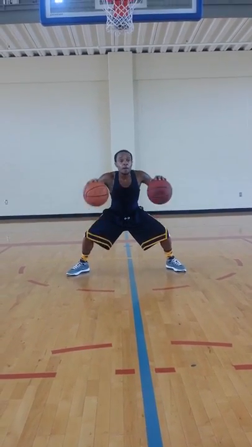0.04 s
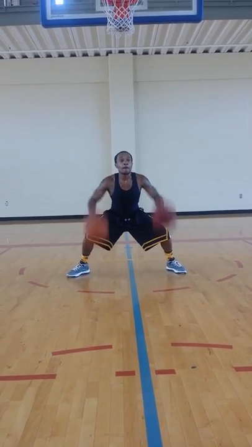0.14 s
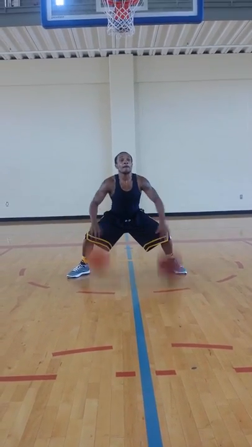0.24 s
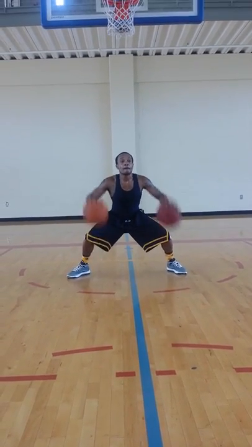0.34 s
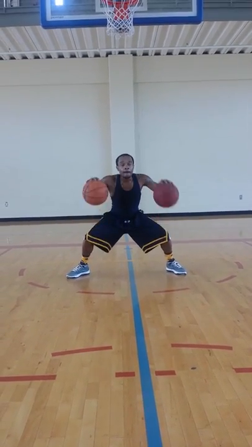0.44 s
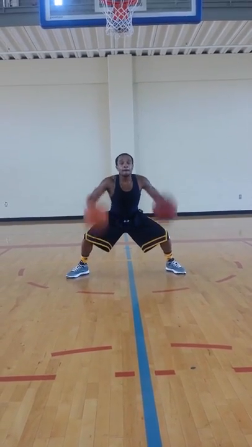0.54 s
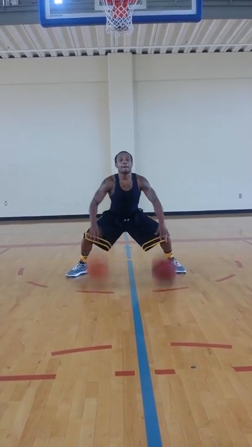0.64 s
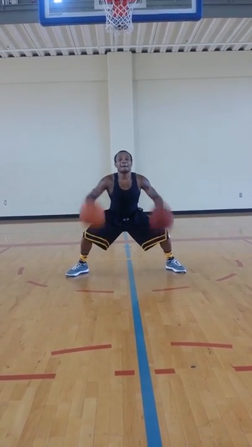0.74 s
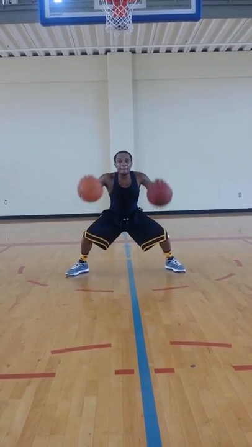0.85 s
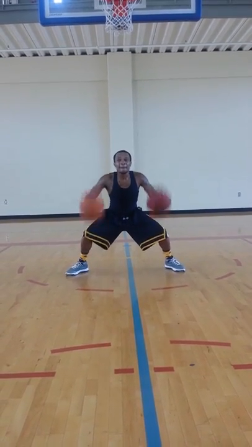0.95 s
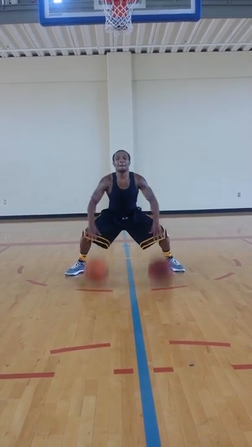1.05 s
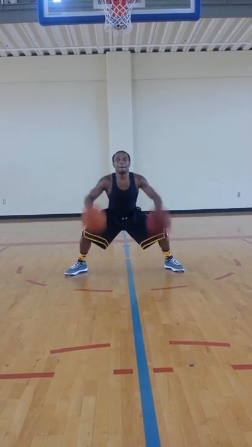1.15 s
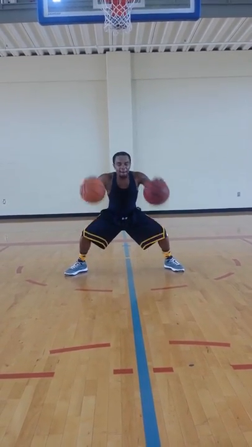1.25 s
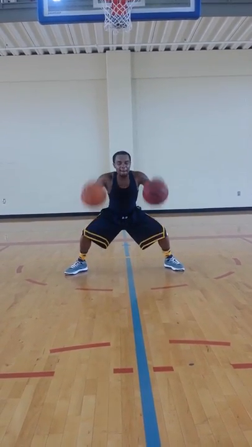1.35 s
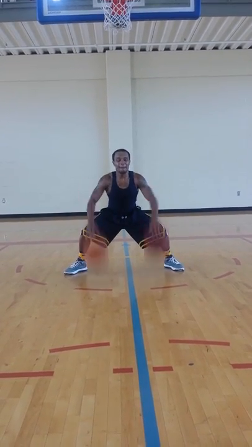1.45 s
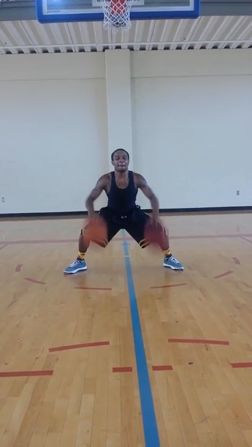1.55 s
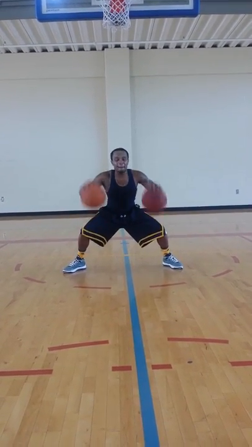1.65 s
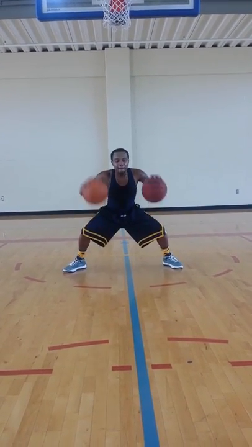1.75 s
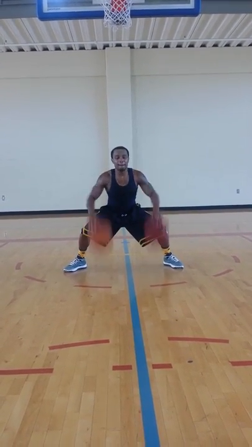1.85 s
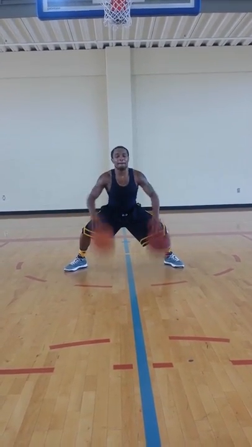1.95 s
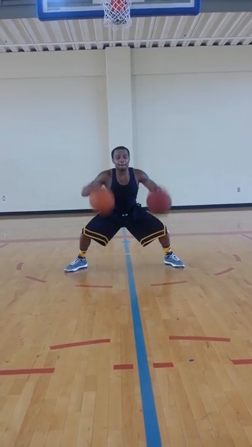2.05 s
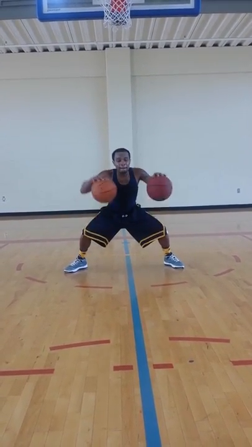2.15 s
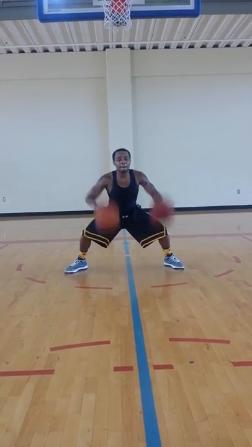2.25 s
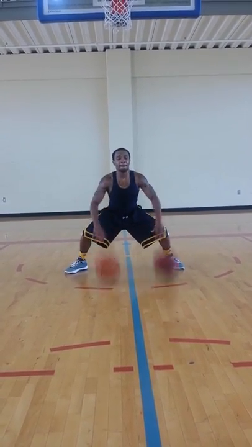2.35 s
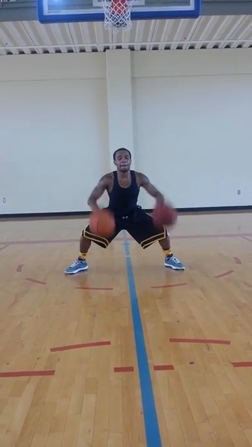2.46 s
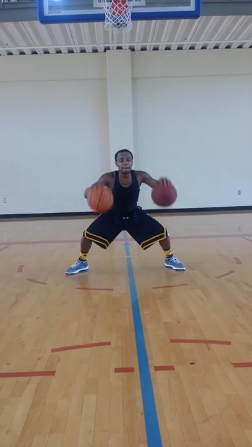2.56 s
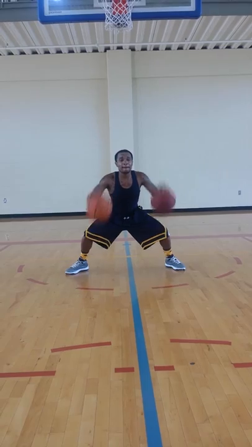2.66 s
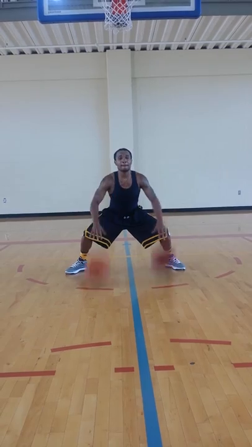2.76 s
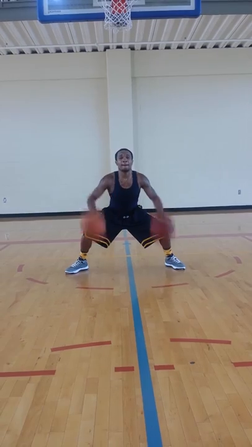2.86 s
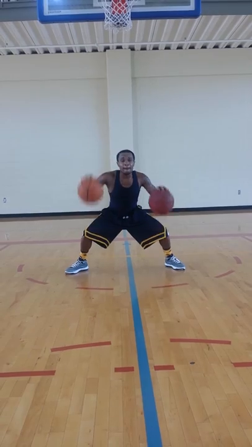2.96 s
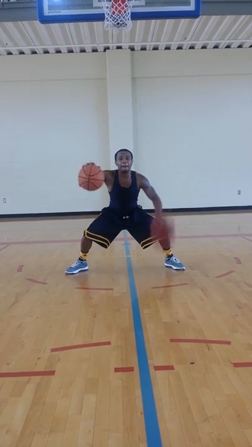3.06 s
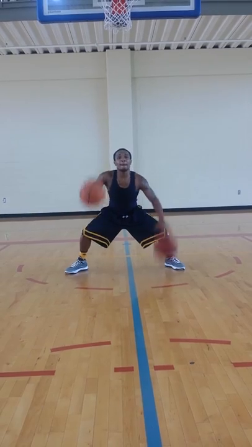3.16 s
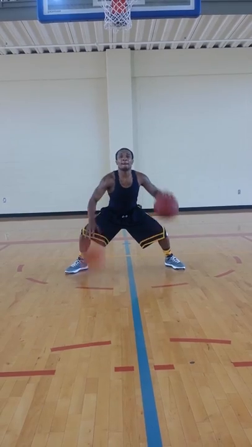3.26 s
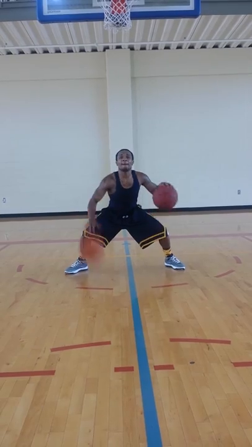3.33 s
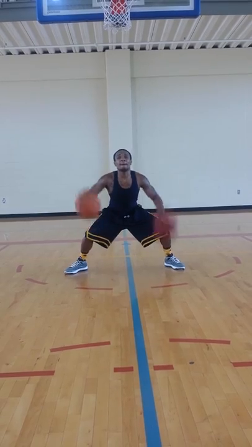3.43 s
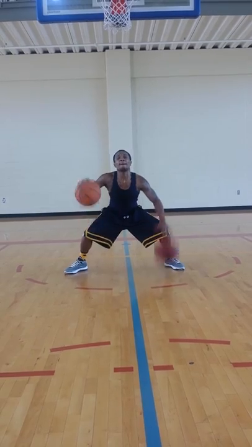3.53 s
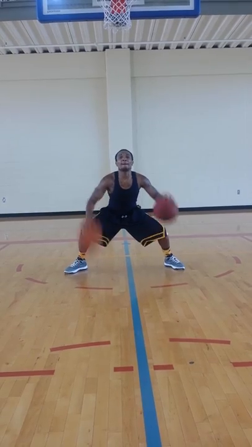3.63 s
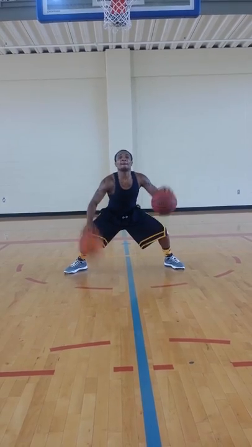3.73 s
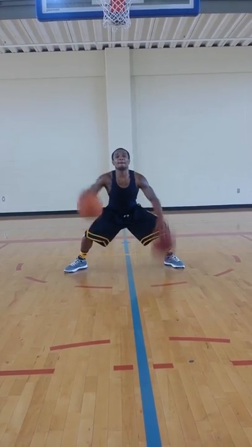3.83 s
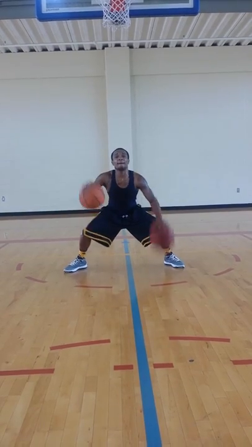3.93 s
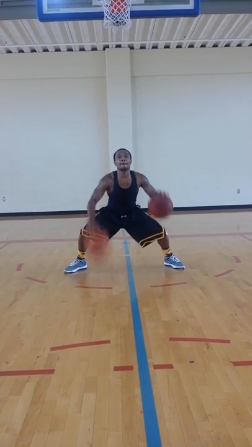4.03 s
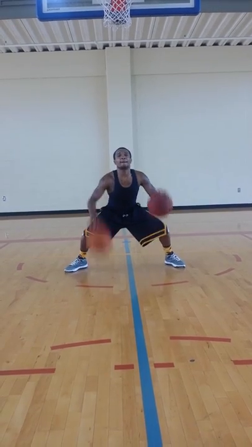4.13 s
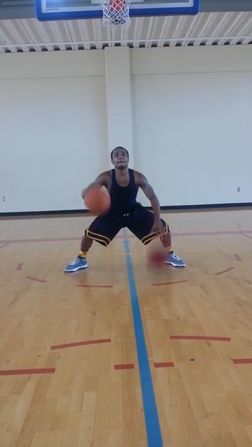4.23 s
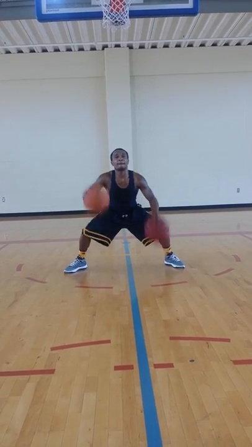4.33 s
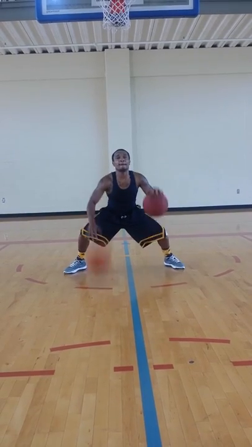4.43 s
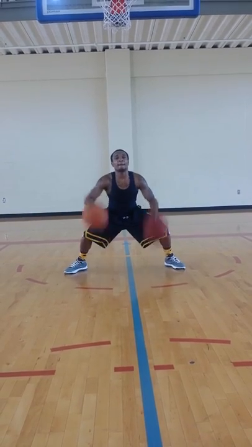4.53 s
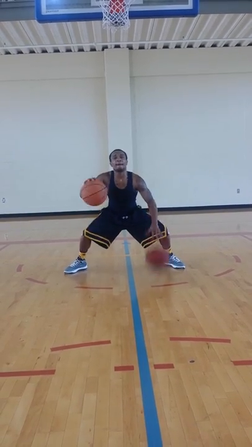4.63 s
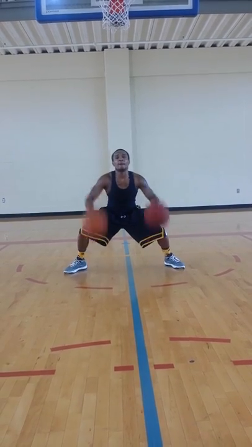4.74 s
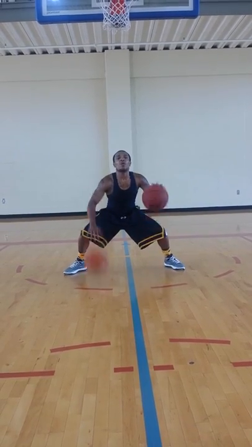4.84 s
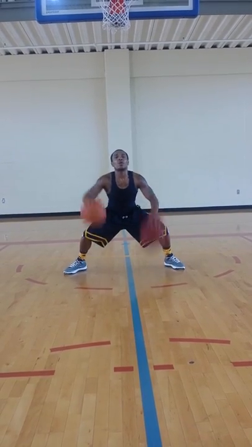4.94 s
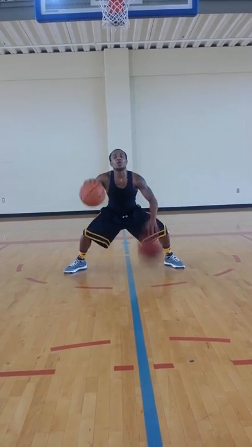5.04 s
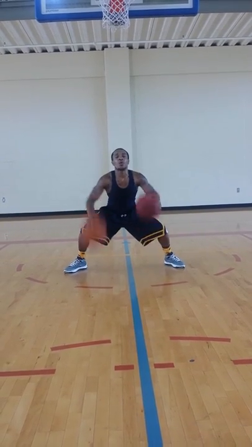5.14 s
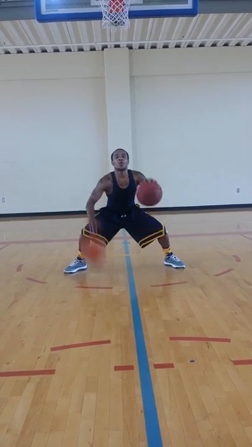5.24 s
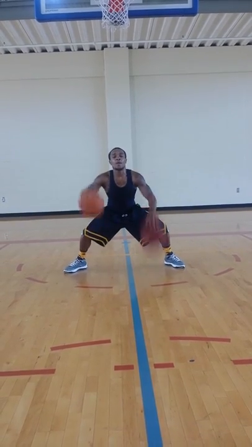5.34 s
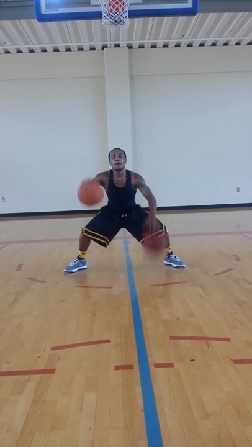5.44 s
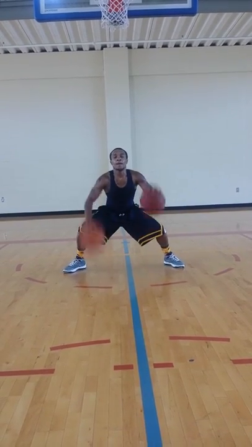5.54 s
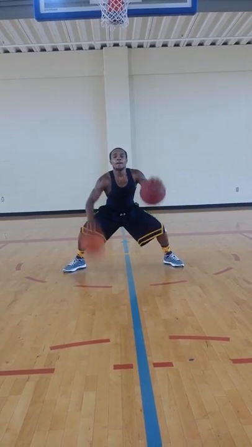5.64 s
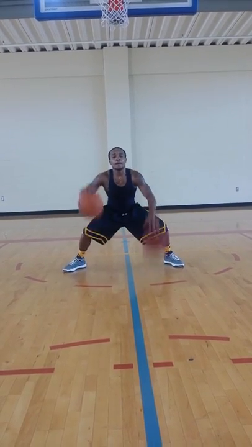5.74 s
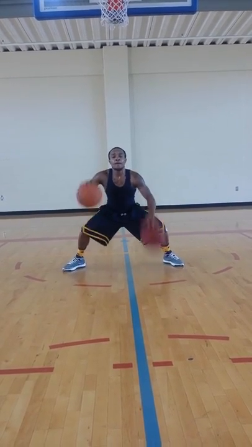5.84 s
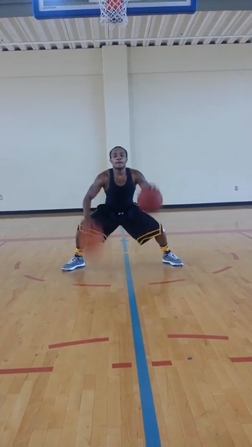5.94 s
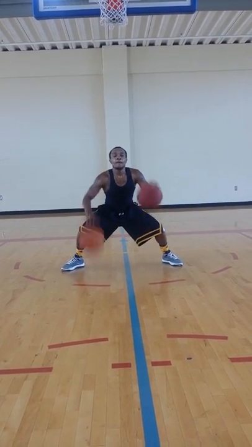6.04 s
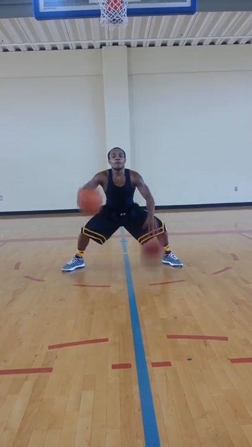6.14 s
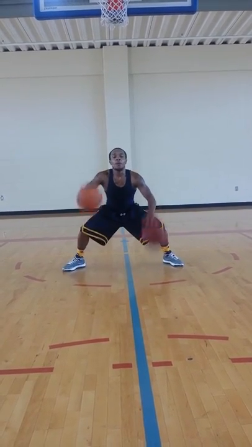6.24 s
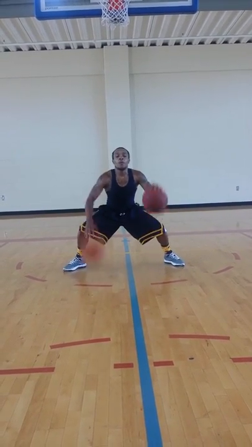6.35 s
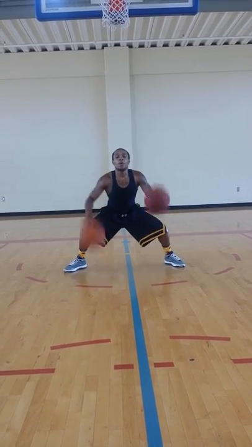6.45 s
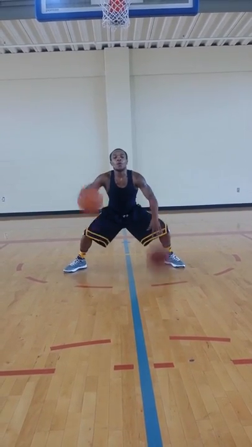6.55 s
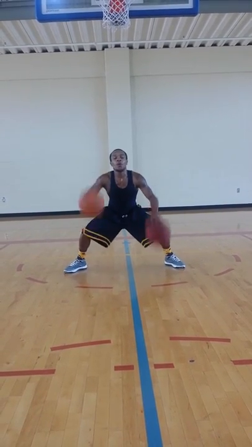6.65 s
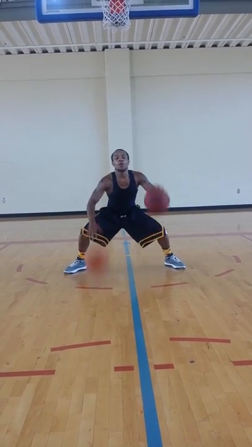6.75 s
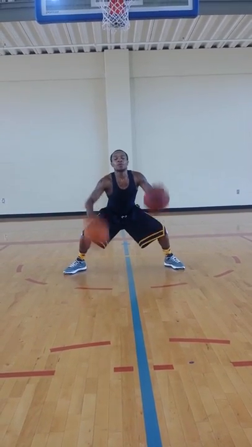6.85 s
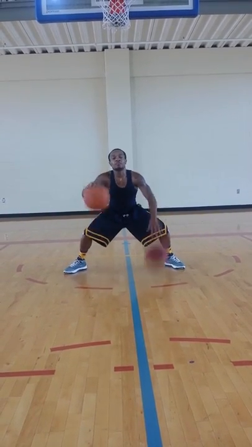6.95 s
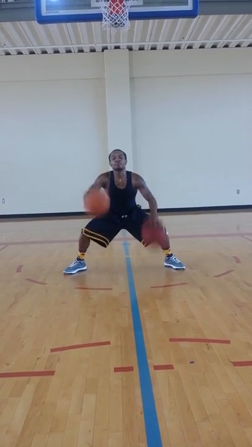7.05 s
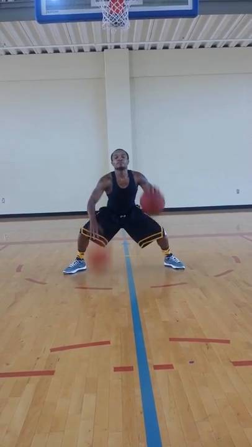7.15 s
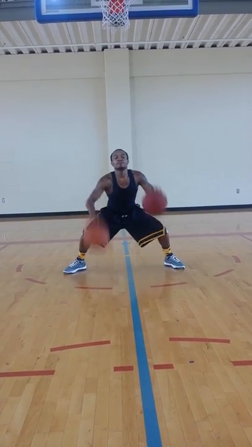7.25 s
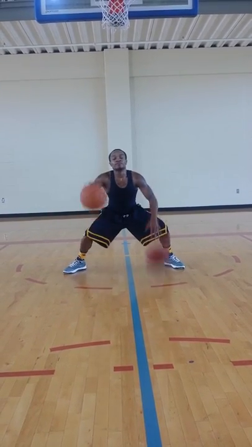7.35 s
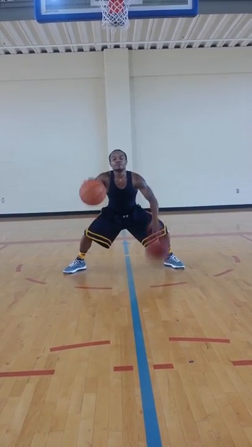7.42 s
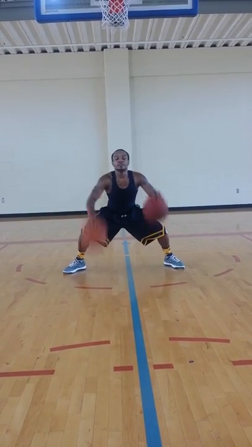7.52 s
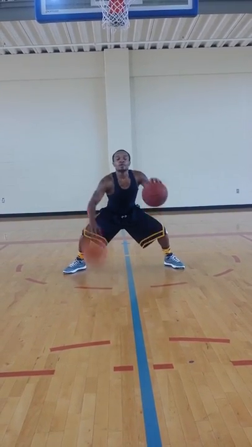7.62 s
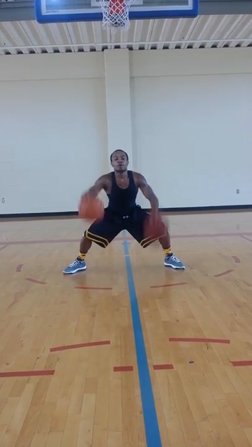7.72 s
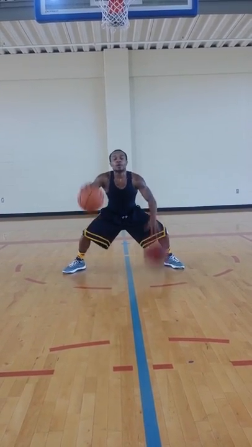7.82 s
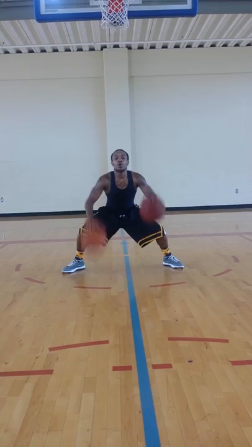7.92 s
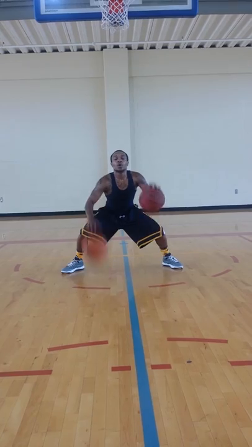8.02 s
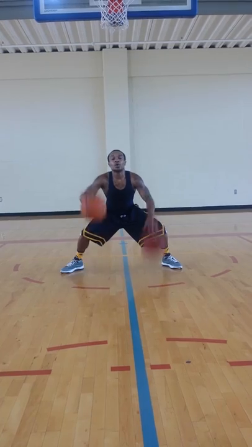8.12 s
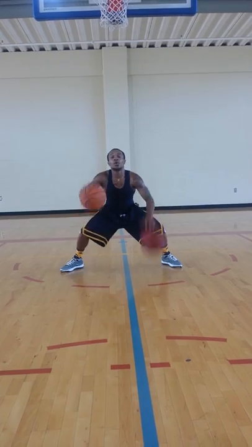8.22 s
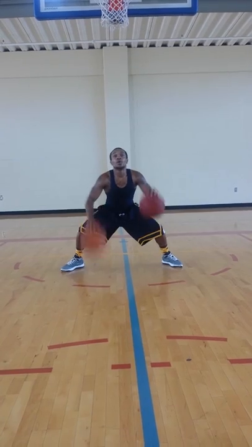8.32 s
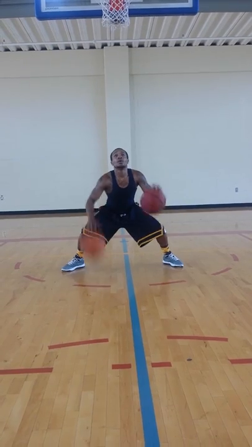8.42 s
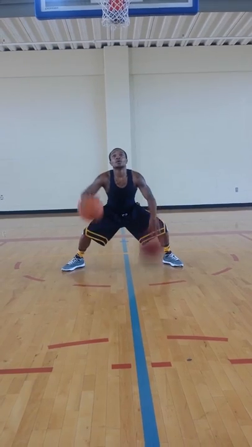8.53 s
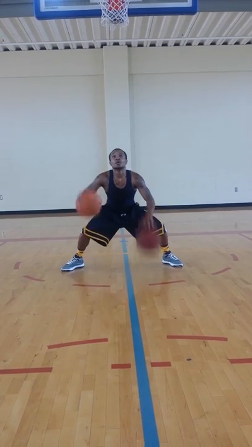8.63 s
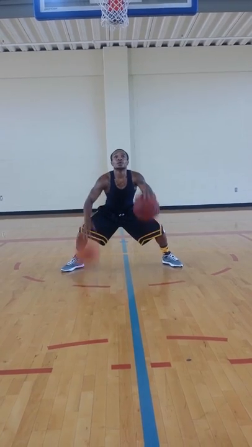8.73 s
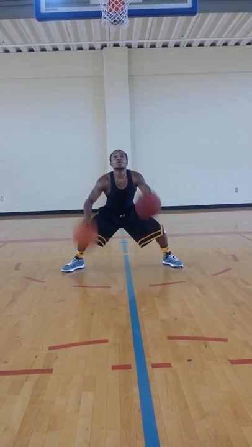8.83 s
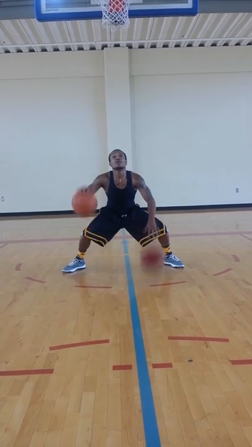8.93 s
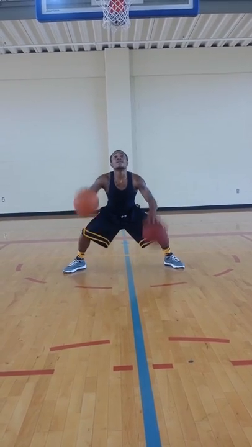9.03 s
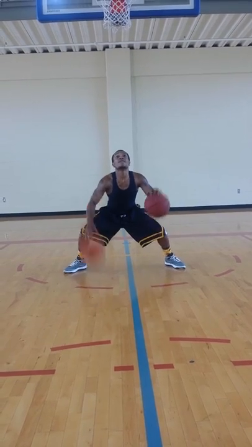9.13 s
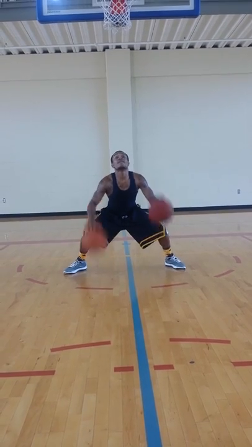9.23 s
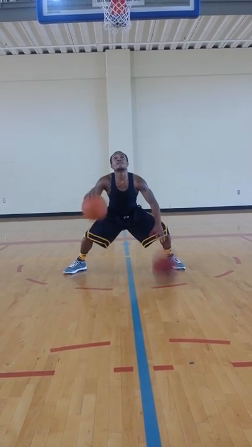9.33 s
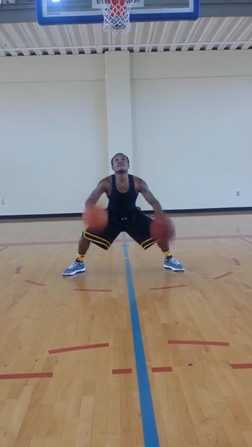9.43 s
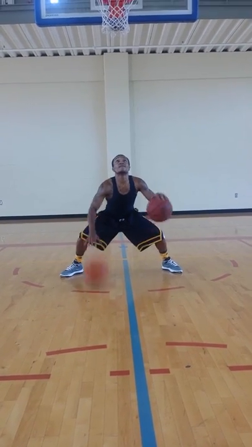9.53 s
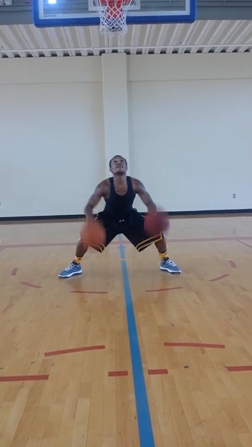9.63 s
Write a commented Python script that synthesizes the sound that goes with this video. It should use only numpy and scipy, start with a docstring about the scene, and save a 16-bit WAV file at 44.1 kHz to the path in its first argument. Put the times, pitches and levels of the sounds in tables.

```python
"""A large gym is already ringing as a player dribbles two basketballs on hardwood, a few metres away.
First the balls land almost together, seven times. Each bounce is a slap and a scuff of rubber, a ping
of the air in the ball and a low thump of ball and boards; walls and roof answer after 40 ms, and a
long tail follows. From about 3.2 s to the end the balls alternate at five bounces a second."""
import sys
import numpy as np
from scipy import signal
from scipy.fft import rfft, irfft
from scipy.io import wavfile

SR = 44100
rng = np.random.default_rng(int(sys.argv[2]) if len(sys.argv) > 2 else 0)


def master_out(mix):
    """Clip the mix to full scale and print it as 16-bit PCM to the path in sys.argv[1]."""
    frames = np.transpose(np.atleast_2d(mix))
    ceiling = np.clip(frames, -1, 1)
    pcm = np.round(ceiling * 32767).astype(np.int16)
    wavfile.write(sys.argv[1], SR, pcm)


N = 426888
PRE_ROLL = SR // 4  # samples: the dribbling is already under way at time zero

# how alike the reverberation is left and right: frequency_hz, correlation
STEREO_LIKENESS = [(100, 1), (290, 0.86), (640, 0.68), (1400, 0.17), (3100, 0.067), (7000, .02)]


def amp(db):
    """Decibels to gain."""
    return 10 ** (np.asarray(db) / 20)


def read(points, hz):
    """Reads a curve on a log-frequency axis."""
    frequencies, values = np.transpose(points)
    return np.interp(np.log(hz + 1), np.log(frequencies + 1), values)


def add(mix, start_s, sound):
    """Mixes a sound in at start_s."""
    part = mix[..., max(round(start_s * SR), 0):][..., :sound.shape[-1]]
    part += sound[..., :part.shape[-1]]


def colour(x, curve, size=4096):
    """Minimum-phase EQ along a curve of frequency_hz, gain_db."""
    cepstrum = irfft(np.log(amp(read(curve, np.fft.rfftfreq(size, 1 / SR)))))
    cepstrum[1:size // 2] *= 2
    cepstrum[size // 2 + 1:] = 0
    return signal.oaconvolve(x, irfft(np.exp(rfft(cepstrum))))[:len(x)]


def burst(t, start_s, rise_s, fall_s):
    """A puff of noise with an energy of about 1."""
    age = np.maximum(t - start_s, 0)
    envelope = (1 - np.exp(-age / rise_s)) * np.exp(-age / fall_s)
    return rng.standard_normal(len(t)) * envelope / np.linalg.norm(envelope)


def ring(t, start_s, hz, t60_s, rise_s=0.0016):
    """A damped sine with a soft attack."""
    age = np.maximum(t - start_s, 0)
    return (1 - np.exp(-age / rise_s)) * amp(-60 * age / t60_s) * np.sin(2 * np.pi * hz * age)


def floor_slap(t):
    """The ball hits the wood: one sharp pressure pulse."""
    # tone of the slap: frequency_hz, gain_db
    slap_eq = [(40, -22), (250, 13.5), (400, -3.5), (540, 12), (780, -3.5), (1100, 7.5), (2300, 4.5),
               (4000, 1.5), (6000, 1), (8000, 0), (11000, -6.5), (14300, -6), (15200, -30)]
    return colour(-1. * (t == 0), slap_eq)


def scuff(t, lift_db=-8):
    """Pebbled rubber scuffs the varnish on landing and, more softly, on lift-off."""
    # tone of rubber on varnish: frequency_hz, gain_db
    scuff_eq = [(100, 5), (500, 1.5), (1100, 9.5), (2300, -19), (4000, -6), (6000, -8.5), (8000, -1),
                (11000, -10), (15000, -56)]
    landing = burst(t, 0, rise_s=0.00037, fall_s=0.0043)
    lift_off = burst(t, 0.0125, rise_s=0.0019, fall_s=0.0016)
    return colour(landing + amp(lift_db) * lift_off, scuff_eq)


def ping(t, modes, landing_db=-6, lift_s=.012, spread_db=2.5):
    """The air in the ball rings on landing and, louder, as the shell springs back; no two blows alike."""
    sound = np.zeros(len(t))
    for (hz, db, t60_s), (detune, strength) in zip(modes, rng.standard_normal((len(modes), 2))):
        pitch_hz = hz * (1 + 0.031 * detune)
        landing = amp(landing_db) * ring(t, 0, pitch_hz, t60_s)
        sound += amp(db + spread_db * strength) * (landing + ring(t, lift_s, pitch_hz, t60_s))
    return sound


def thump(t, pitch_hz=114.5, overtone_hz=210, overtone_db=-15, base_db=-16.5):
    """Ball and boards swing while they touch, and stop soon after the ball lifts off."""
    lag_s, contact_s, release_s = 0.00056, 0.014, .0025
    phase_per_hz = 2 * np.pi * (t - lag_s) * (1 + .02 * rng.standard_normal())
    swing = np.sin(pitch_hz * phase_per_hz) + amp(overtone_db) * np.sin(overtone_hz * phase_per_hz)
    swing *= np.exp(-np.maximum(t - contact_s, 0) / release_s)
    # the air pushed aside returns
    backflow = np.sin(np.pi * np.minimum(t / (contact_s + 2 * release_s), 1))
    return amp(base_db) * (swing - backflow * swing.sum() / backflow.sum())


def bounce(slap_db, bright_db, crack_db, zing_db, thump_db, modes, zing_hz, crack_hz=2400):
    """One bounce as slap and body; the patch of rubber that lands colours all but the thump."""
    # how much of the brightness each frequency takes: frequency_hz, share
    tilt = [(700, 0.1), (2400, 0), (5000, 0.32), (10500, 0.64)]
    t = np.arange(SR // 6) / SR
    hz = np.geomspace(100, 16000, 90)
    crack = np.exp(-(np.log(hz / crack_hz) / .3) ** 2)
    zing = np.exp(-(np.log(hz / zing_hz) / .11) ** 2)
    patch_db = slap_db + bright_db * read(tilt, hz) + crack_db * crack + zing_db * zing
    patch_eq = np.column_stack([hz, patch_db])
    slap = colour(floor_slap(t), patch_eq)
    body = colour(scuff(t) + ping(t, modes), patch_eq) + amp(thump_db) * thump(t)
    return slap, body


def pushes(ball, voice, thump_growth=0.64, crack_spread_db=2, zing_spread_db=2.5):
    """Times and levels of one ball's bounces: a hard push adds more slap than boom."""
    # every landing, first in pairs, then in turn: start_s, ball, force_db, brightness_db
    landings = [ (-0.125, "orange", 1, -5), (-0.122, "dark", 1.5, -1), (0.2944, "orange", -1.5, 2.5),
                (0.2985, "dark", 1.5, -1), (0.7133, "orange", 1.5, -22), (0.7144, "dark", 4.5, 7),
                (1.1243, "orange", 1, 1), (1.128, "dark", 0.5, -1.5), (1.5586, "orange", 0.5, -2),
                (1.56, "dark", -0.5, -0.5), (1.9736, "orange", 0, -1), (1.9768, "dark", 0.5, 3),
                (2.4061, "orange", 0.5, 0.5), (2.4173, "dark", 1, -6), (2.8402, "orange", -3.5, 9),
                (2.8404, "dark", 1, -12), (3.1792, "dark", 2, -0.5), (3.3569, "orange", 3, -5.5),
                (3.5519, "dark", 3.5, -0.5), (3.749, "orange", 0, 1.5), (3.9277, "dark", 3, 0.5),
                (4.1397, "orange", -0.5, -3.5), (4.309, "dark", 2.5, 1.5), (4.5192, "orange", 0, -2),
                (4.6948, "dark", 0, 6.5), (4.9077, "orange", 0.1, 2), (5.0825, "dark", 3.5, -3),
                (5.2941, "orange", 0.9, -7.5), (5.4751, "dark", 1, 6), (5.6837, "orange", -4, 3.5),
                (5.8668, "dark", 2.1, -5), (6.0788, "orange", -3, -1.5), (6.259, "dark", 1, -1.5),
                (6.4666, "orange", -2.7, -1.5), (6.6478, "dark", -1.5, 4), (6.8557, "orange", -3.5, -1),
                (7.0564, "dark", 2.5, 4), (7.263, "orange", 2.1, -7), (7.4529, "dark", 3, -0.5),
                (7.6617, "orange", -0.3, 0.5), (7.859, "dark", 2, 1.5), (8.057, "orange", 0.5, -4.5),
                (8.2399, "dark", 0.3, 2), (8.4546, "orange", -2.8, 4.5), (8.634, "dark", 2.7, -2.5),
                (8.8358, "orange", -0.7, -3), (9.0201, "dark", 0, 5.5), (9.2413, "orange", -5.5, 1.5),
                (9.4074, "dark", -1.7, 5.5), (9.6139, "orange", -3, -9.5)]
    # slow drift of the crack, for both balls: time_s, level_db
    crack_drift = [(0, -1.5), (1.5, 1.5), (2.8, -3), (4.2, -1), (5.8, 0), (6.3, 2), (7.3, 0.5), (9.6, -0.5)]
    slap_db, crack_db, zing_db, thump_db = voice
    rows = []
    for start_s, name, force_db, bright_db in landings:
        if name != ball:
            continue
        spin = rng.standard_normal(2)  # the ball spins, so another patch of rubber lands each time
        crack = crack_db + np.interp(start_s, *np.transpose(crack_drift)) + crack_spread_db * spin[0]
        zing = zing_db + zing_spread_db * spin[1]
        boom = thump_db + thump_growth * force_db
        rows.append((start_s, slap_db + force_db, bright_db, crack, zing, boom))
    return rows


def seam_scatter(slap, spread_db=4.0):
    """Seams and pebbles beam each slap a little differently toward the listener."""
    hz = np.geomspace(800, 16000, 50)
    ripple_db = spread_db * rng.standard_normal(len(hz)) * (hz > hz[0])
    return colour(slap, np.column_stack([hz, ripple_db]))


def left_port(slap):
    """Small surfaces by the left microphone port reflect the slap; long waves pass them by."""
    # close reflections: delay_ms, signed_gain
    reflections = [(.38, .5), (.87, .5), (1.87, .8), (1.97, -.85)]
    # tone of the direct slap on the left: frequency_hz, gain_db
    port_eq = [(100, 0), (600, 0.5), (1200, -4), (2400, 4), (4000, -9.5), (5800, 5), (7500, -4.5),
               (9000, -8), (15000, -16.5)]
    taps = np.zeros(SR // 200)
    for delay_ms, gain in reflections:
        add(taps, delay_ms / 1000, np.array([gain]))
    reflected = signal.oaconvolve(slap, taps)[:len(slap)]
    reflected = signal.lfilter(*signal.butter(1, 350, "high", fs=SR), reflected)
    return colour(slap + reflected, port_eq)


def echo_cluster(centre_hz, width=0.19):
    """Roof ribs and wall fittings return a tight bunch of echoes around one pitch, with energy 1."""
    t = np.arange(SR // 30) / SR
    edges_hz = [centre_hz / (1 + width), centre_hz * (1 + width)]
    band = signal.butter(2, edges_hz, "band", fs=SR, output="sos")
    bunch = signal.sosfilt(band, burst(t, 0, rise_s=0.0012, fall_s=0.0016))
    return bunch / np.linalg.norm(bunch)


def diffuse_tail(onset_s=.041, before_db=-11, early_db=2, early_s=0.018):
    """Dense reflections: faint until the walls answer, then a long decay that loses its treble."""
    # reverb time of the gym: frequency_hz, t60_s
    decay_times = [(60, 0.41), (130, 3.28), (400, 3.8), (1200, 2.37), (3000, 2.9), (6000, 1.88),
                   (9000, 1.01), (14000, 0.11)]
    size = 2 * SR
    hz, t, noise = signal.stft(rng.standard_normal((2, size)), SR, nperseg=512)
    likeness = read(STEREO_LIKENESS, hz)[:, None]
    noise[1] = likeness * noise[0] + np.sqrt(1 - likeness ** 2) * noise[1]
    decay = amp(-60 * t / read(decay_times, hz)[:, None])
    tail = signal.istft(noise * decay, SR, nperseg=512)[1][:, :size]
    age = np.arange(size) / SR - onset_s
    onset_db = np.where(age < 0, before_db, early_db * np.exp(-abs(age) / early_s))
    return tail * amp(onset_db) / np.sqrt(.2 * SR)


def gym_response(cluster_trim_db=-6):
    """The gym's stereo impulse response: single and clustered echoes over the diffuse tail."""
    # single echoes off walls and roof: delay_s, level_db
    echoes = [(.0408, -21.5), (0.0449, -13.5), (0.051, -14.5), (0.0735, -15), (0.0879, -15), (.1022, -14.5),
              (0.127, -33), (0.1486, -16.5)]
    # walls mirror the bass and scatter the treble: frequency_hz, gain_db
    wall_eq = [(200, -2), (700, -6.5), (3000, 0), (7000, -4), (12000, -25)]
    # echo bunches off the ribbed roof and wall fittings: delay_s, centre_hz, level_db
    clusters = [(.0445, 550, -18.5), (.0445, 2420, -15.5), (0.05, 2500, -15.5), (.072, 1510, -17),
                (.075, 1065, -17.5), (0.0746, 5900, -14.5), (.087, 1170, -23)]
    # overall tone of the room: frequency_hz, gain_db
    gym_eq = [(35, -1.5), (70, 0), (130, -4.5), (230, -1.5), (400, 5), (540, -2.5), (1200, -1), (2500, 2.5),
              (3500, -1.5), (6000, -2.5), (8000, -1), (10000, 2), (14000, -2)]
    response = diffuse_tail()
    echo = colour(signal.unit_impulse(SR // 20), wall_eq)
    for delay_s, db in echoes:
        for side in response:  # each echo arrives at slightly different moments left and right
            add(side, delay_s + .0003 * rng.standard_normal(), amp(db) * echo)
    for delay_s, centre_hz, db in clusters:
        likeness = read(STEREO_LIKENESS, centre_hz)
        left = echo_cluster(centre_hz)
        right = likeness * left + np.sqrt(1 - likeness ** 2) * echo_cluster(centre_hz)
        add(response, delay_s, amp(db + cluster_trim_db) * np.array([left, right]))
    return np.array([colour(side, gym_eq) for side in response])


def dribble(ball, voice, modes, zing_hz, reverb_db=1.0, spots=3):
    """One ball lands on a few nearby spots; the gym answers each spot's slap and body in its own way."""
    # left minus right for sound from all around: frequency_hz, gain_db
    balance_eq = [(100, 2.5), (700, 1.5), (1300, 4), (2400, 5), (4400, 7), (5800, 11.5), (7500, 0.5),
                  (10000, -10), (15000, -8)]
    size = PRE_ROLL + N
    slaps, bodies = np.zeros((2, spots, size))
    direct = np.zeros(size)
    for k, (start_s, *levels) in enumerate(pushes(ball, voice)):
        slap, body = bounce(*levels, modes, zing_hz)
        at_s = start_s + PRE_ROLL / SR
        add(direct, at_s, seam_scatter(slap))
        add(slaps[k % spots], at_s, slap)
        add(bodies[k % spots], at_s, body)
    sends = [*slaps, *bodies]
    reverb = sum(signal.fftconvolve(send[None], gym_response(), axes=1)[:, :size] for send in sends)
    left, right = bodies.sum(0) + amp(reverb_db) * reverb
    return np.array([colour(left, balance_eq) + left_port(direct), right + direct])


def scene():
    """Two balls in the gym, each with its own voice."""
    # each ball's level trims: slap_db, crack_db, zing_db, thump_db
    orange_voice = (0.49, 0.64, 1.3, 0.0077)
    dark_voice = (-0.83, -0.45, -1.8, -1.46)
    # resonances of the air inside each ball: pitch_hz, level_db, t60_s
    orange_modes = [(917, -19.5, 0.014), (1160, -37, 0.026), (1596, -33.5, 0.036), (2157, -41, 0.047),
                    (2490, -39.5, 0.021), (5900, -37, 0.01)]
    dark_modes = [(1098, -19, 0.011), (1610, -48, 0.02), (2230, -34, 0.016), (4220, -29.5, 0.011),
                  (5300, -46, 0.0073), (6020, -44, 0.013)]
    orange = dribble("orange", orange_voice, orange_modes, zing_hz=5900)
    dark = dribble("dark", dark_voice, dark_modes, zing_hz=5260)
    return (orange + dark)[:, PRE_ROLL:]


def record(dry):
    """Cuts the rumble, clips the sharpest peaks near full scale, then trims the top treble."""
    low_cut_hz, high_cut_hz, ceiling = 39, 15000, .93
    heard = signal.sosfiltfilt(signal.butter(2, low_cut_hz, "high", fs=SR, output="sos"), dry)
    low_pass = signal.firwin(127, high_cut_hz, window=("kaiser", 9), fs=SR)
    return signal.oaconvolve(np.clip(heard, -ceiling, ceiling), low_pass[None], "same")


dry = scene()
out = record(dry)
master_out(out)
```